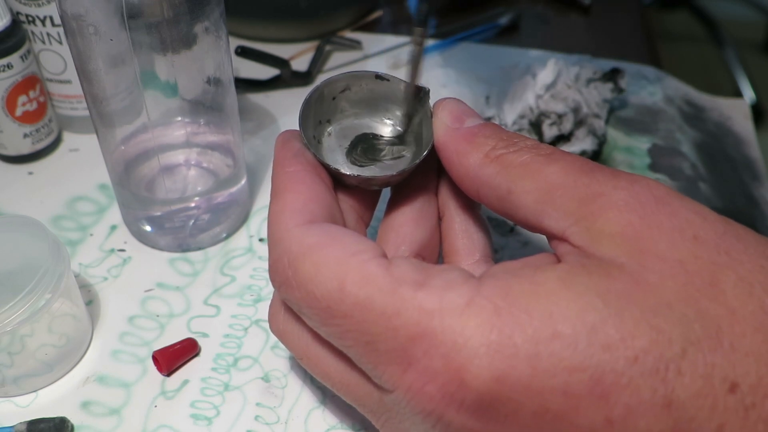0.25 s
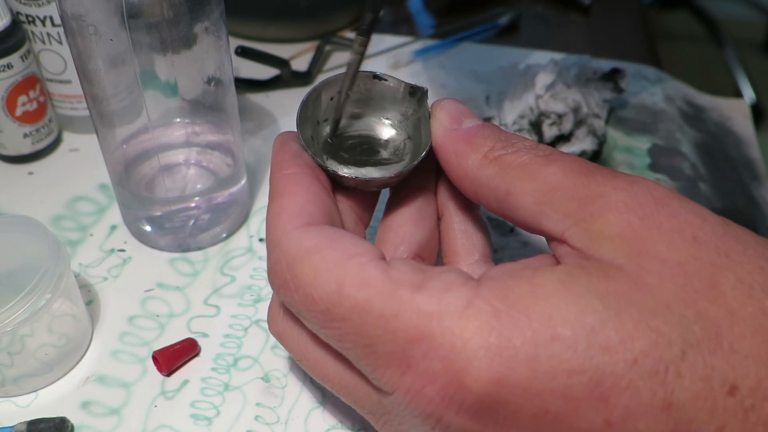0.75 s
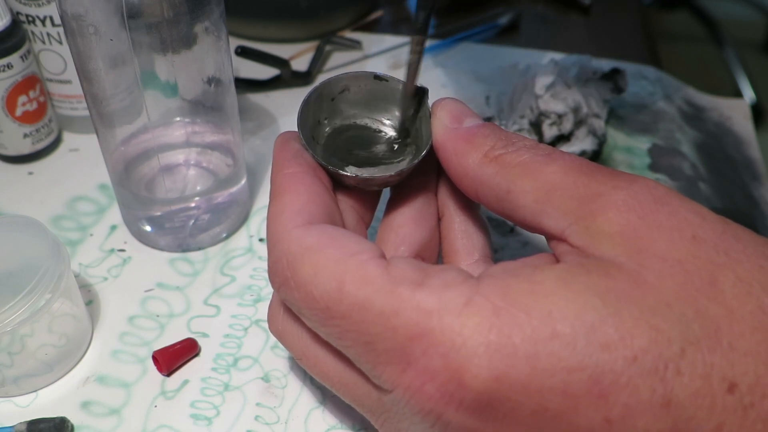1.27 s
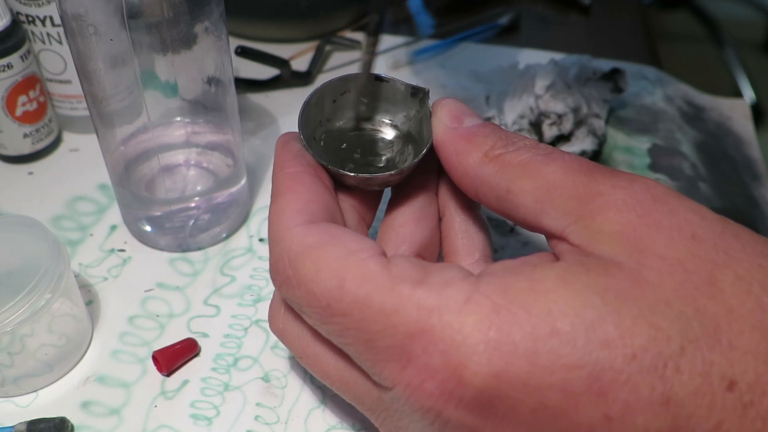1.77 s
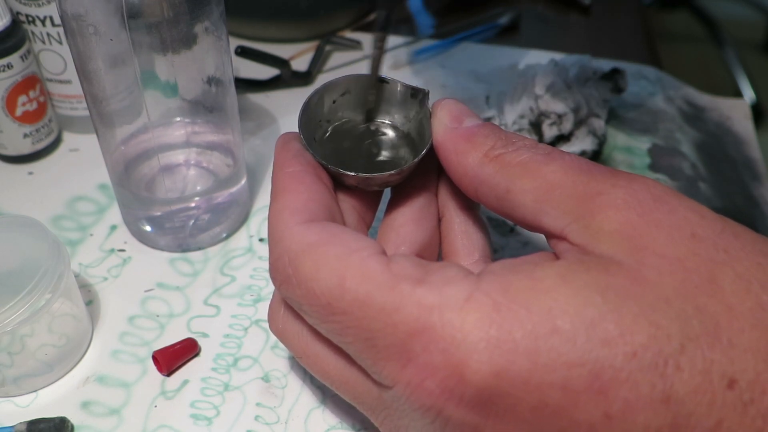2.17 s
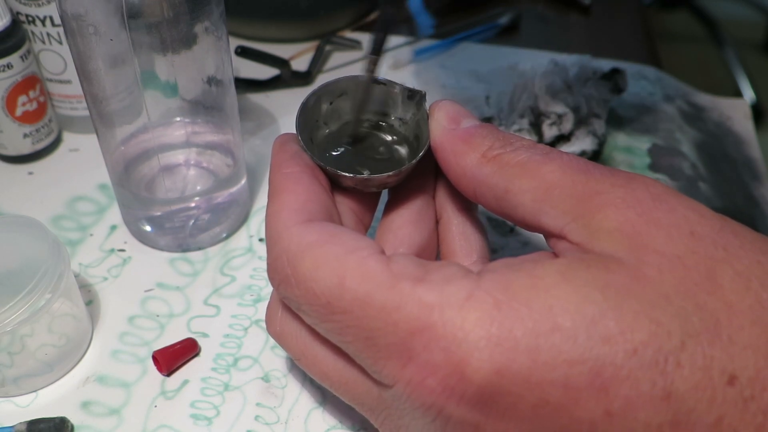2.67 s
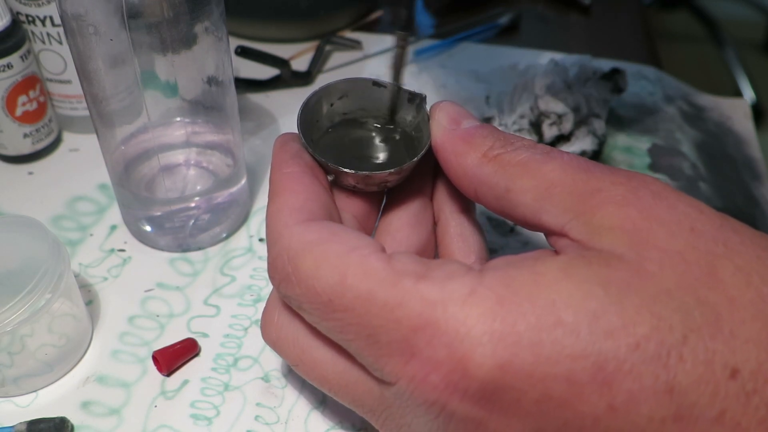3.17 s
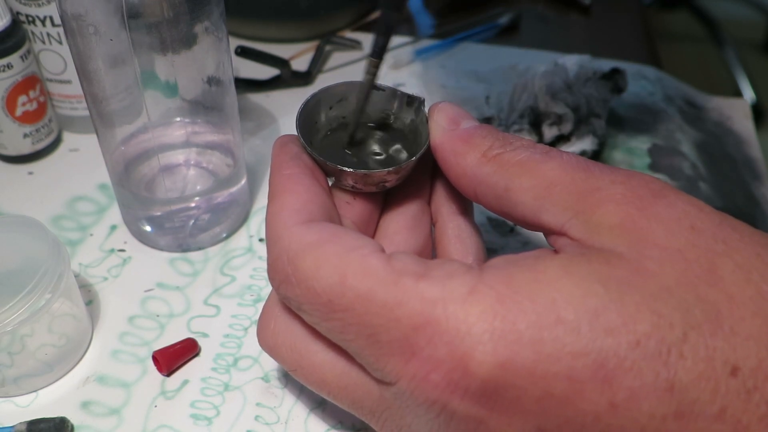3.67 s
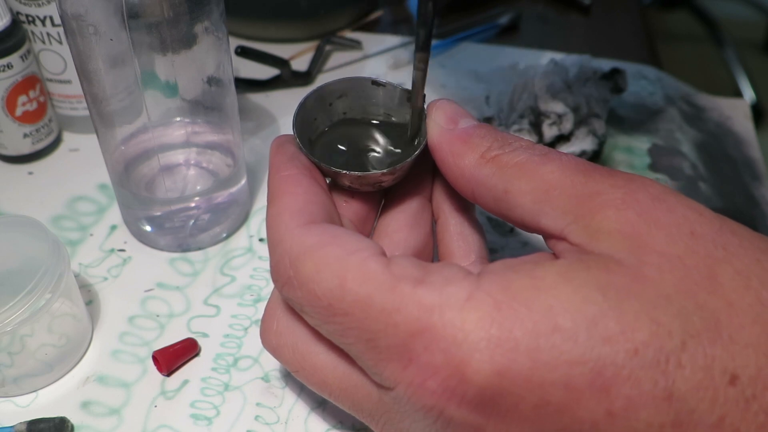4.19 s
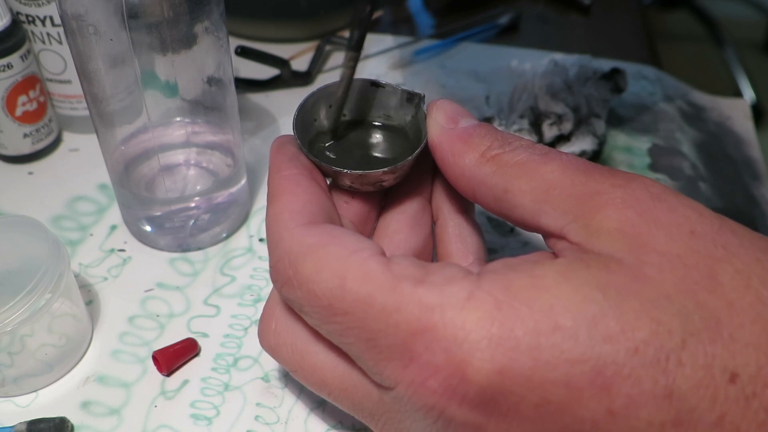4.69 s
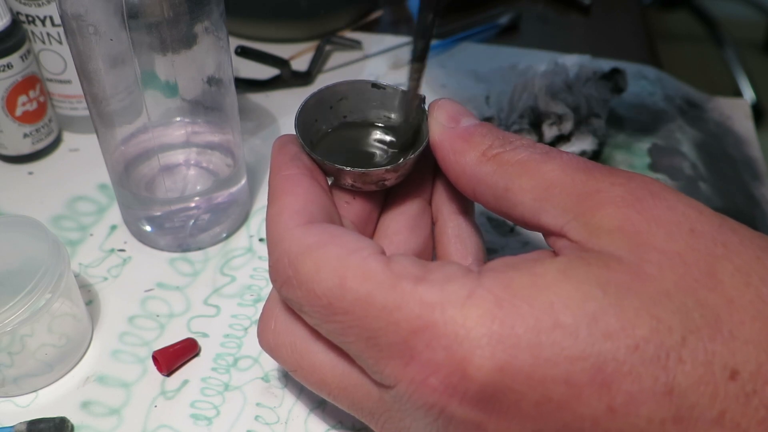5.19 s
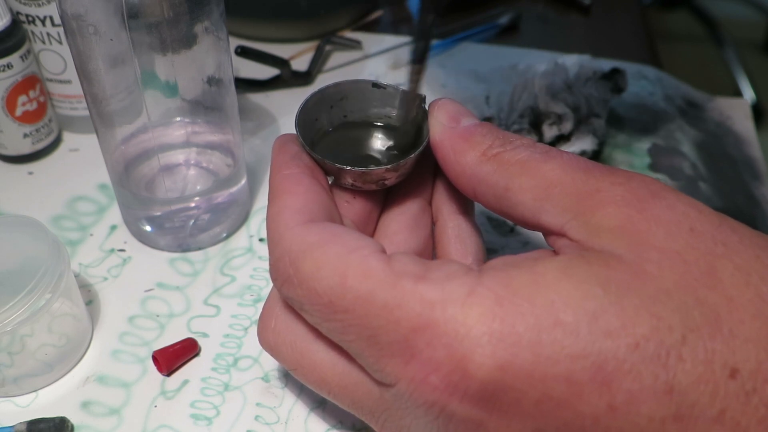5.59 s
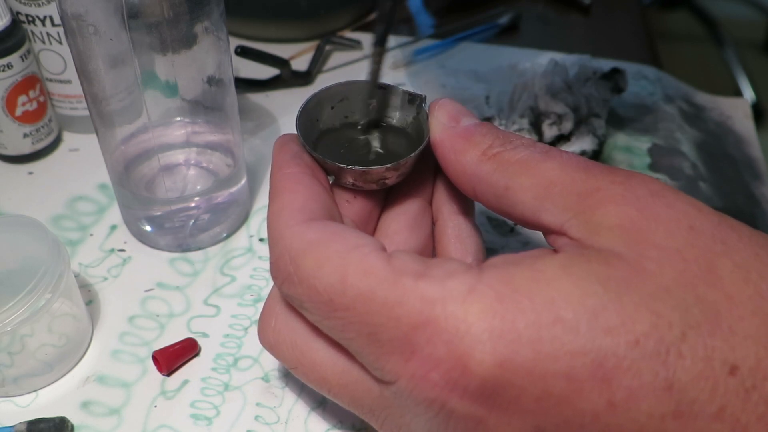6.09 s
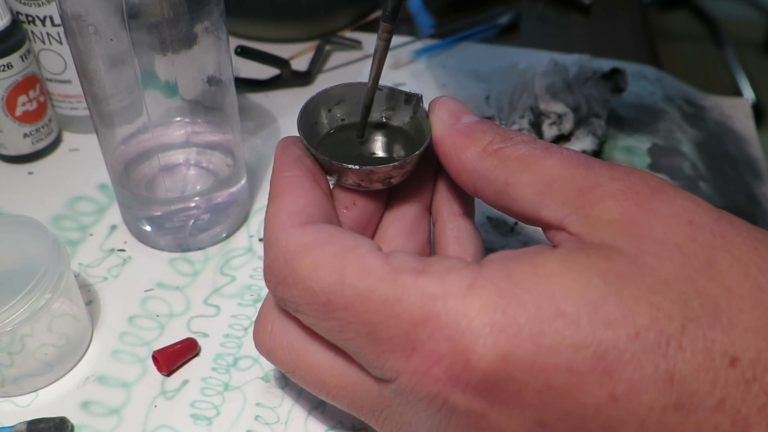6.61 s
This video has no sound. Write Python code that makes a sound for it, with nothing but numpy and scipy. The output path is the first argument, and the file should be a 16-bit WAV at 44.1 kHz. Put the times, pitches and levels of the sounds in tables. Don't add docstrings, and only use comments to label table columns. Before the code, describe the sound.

Fast, slightly uneven stirring in a tiny metal cup: bristles hiss brightly across the bottom while the metal collar scrapes, taps and sharply clicks against the wall. Dry scrapes lead in the first two seconds, then wetter, stronger swishes take over with scattered hard ticks and brief thin squeaks. Little liquid plips come in the last half second. Close stereo microphone, small quiet room, low steady hiss and barely audible hum.

```python
import sys
import numpy as np
from scipy import signal
from scipy.io import wavfile

SR = 44100
rng = np.random.default_rng(int(sys.argv[2]) if len(sys.argv) > 2 else 0)


def unload_audio(sound):
    columns = np.transpose(np.atleast_2d(sound))
    steps = np.round(np.clip(columns, -1, 1) * 32767)
    wavfile.write(sys.argv[1], SR, steps.astype(np.int16))


def invert_db(level):
    return 10 ** (np.asarray(level, dtype=float) / 20)


N = 302085
SLOW_STEP = 40
LEFT_RIGHT = np.array([[1], [-1]])


def rms_one(x):
    return x / np.sqrt(np.mean(x ** 2) + 1e-20)


def at_hz(points, hz):
    curve_hz, value = np.transpose(points)
    return np.interp(np.log(hz), np.log(curve_hz), value)


def pan(left_right_db):
    return invert_db(LEFT_RIGHT * left_right_db / 2)


def drift(rate_hz):
    r = np.exp(-2 * SLOW_STEP * np.pi * rate_hz / SR)
    noise = rng.standard_normal(N // SLOW_STEP + 1001)
    return rms_one(signal.lfilter([1], [1, -2 * r, r * r], noise)[1000:])


def full_rate(slow):
    return np.repeat(slow, SLOW_STEP, axis=-1)[..., :N]


def strokes(rows, extra_db, edge):
    power = np.zeros(N)
    for row, more_db in zip(rows, extra_db + np.zeros(len(rows))):
        start_s, level_db, rise_ms, fall_ms = row[:4]
        first, last = max(0, round((start_s - .15) * SR)), min(N, round((start_s + .2) * SR))
        i = np.arange(first, last)
        late_ms = 1000 * (i / SR - start_s)
        span_ms = np.where(late_ms < 0, max(rise_ms, 1), max(fall_ms, 1))
        shape = np.exp(-(np.abs(late_ms) / span_ms) ** np.where(late_ms < 0, edge, 1.4))
        power[i] += (invert_db(level_db + more_db) * shape) ** 2
    return np.sqrt(power)


def grit(per_s, spread_db):
    sizes = invert_db(spread_db * np.minimum(rng.exponential(1, N), 4)) * rng.choice([-1, 1], N)
    return rms_one(sizes * (rng.random(N) < per_s / SR))


def two_ports(per_s, spread_db, unlike):
    shared = np.sqrt(1 - unlike) * grit(per_s, spread_db)
    opposed = np.sqrt(unlike) * grit(per_s, spread_db) * LEFT_RIGHT
    return shared + opposed


# time_s, dryness [0-1]
DRYNESS = [(0, 0.73), (1.5, 0.68), (2.1, 0.36), (3.6, 0), (4.2, 0.1), (6.85, 0.08)]


def cup(force, modes, wander_db):
    out, power = np.zeros((2, N)), 0
    slow_s = np.arange(N // SLOW_STEP + 1) * SLOW_STEP / SR
    dry = np.interp(slow_s, *np.transpose(DRYNESS))
    for k, (hz, width_hz, level_db, lag_rad, dry_db) in enumerate(modes):
        grip_db = wander_db * drift(9.15) + dry_db * dry
        facing_db = 0.69 * wander_db * drift(6.6) * LEFT_RIGHT
        left, right = force * full_rate(invert_db(level_db + grip_db + facing_db)) + 1e-18
        r, w = np.exp(-np.pi * width_hz / SR), 2 * np.pi * hz / SR
        zeros = (-1) ** k * (1 - r * r) / 2 * np.array([1, 0, -1])
        poles = [1, -2 * r * np.cos(w), r * r]
        late = np.sin(lag_rad) / np.sin(w)
        lag_taps = [np.cos(lag_rad) - late * np.cos(w), late]
        out[0] += signal.lfilter(zeros, poles, left)
        out[1] += signal.lfilter(np.convolve(zeros, lag_taps), poles, right)
        power += invert_db(level_db) ** 2 * np.pi * width_hz / SR
    return out / np.sqrt(power) * invert_db(-.13 * wander_db ** 2)


# pitch_hz, density_db_per_hz
HISS = [(24, -85), (40, -45.5), (354, -9.5), (570, -8.5), (733, -10), (2100, -16), (2260, -16), (2700, -6),
        (2980, -15), (4680, -17), (16000, -33)]
# pitch_hz, correlation [-1 to 1]
LIKENESS = [(60, -0.36), (150, -0.54), (380, -0.71), (950, -0.27), (2380, 0.38), (5980, 0.29),
            (15000, 0.0019)]


def room_hiss():
    hiss_db, hum_db, hum_hz = -66, -107.5, 120
    hiss = 0
    edges_hz = 30 * 2 ** np.arange(0, 9.6, .5)
    white = rng.standard_normal((2, 2, N))
    for k, (low_hz, high_hz) in enumerate(zip(edges_hz, edges_hz[1:])):
        band_hz = [low_hz, min(high_hz, .45 * SR)]
        mid, side = signal.sosfilt(signal.butter(2, band_hz, "band", fs=SR, output="sos"), white[k % 2])
        hz = np.sqrt(low_hz * high_hz)
        alike = np.clip(at_hz(LIKENESS, hz), -1, 1)
        sway_db = 2.25 * drift(5.8) * np.clip(200 / hz, .2, 1)
        band = np.sqrt(1 + alike) * mid + np.sqrt(1 - alike) * side * LEFT_RIGHT
        hiss = hiss + full_rate(invert_db(at_hz(HISS, hz) + sway_db)) * band
    hum_level = full_rate(invert_db(hum_db + 5.9 * drift(8.8)))
    hum = hum_level * np.sqrt(2) * np.sin(2 * np.pi * hum_hz * np.arange(N) / SR)
    return invert_db(hiss_db) * rms_one(hiss) + hum


def room(x):
    t60_s, level_db, first_echo_s = 0.31, -21.5, .004
    t = np.arange(SR // 3) / SR
    tail = rng.standard_normal((2, len(t))) * invert_db(-60 * t / t60_s) * (t > first_echo_s)
    tail = tail / np.sqrt(np.sum(tail ** 2, axis=1, keepdims=True))
    return invert_db(level_db) * signal.fftconvolve(x, tail, axes=1)[:, :N]


# start_s, peak_db, pitch_hz
DRIPS = [
    (6.315, -49.5, 2730),
    (6.323, -71, 2750),
    (6.393, -63, 2540),
    (6.5755, -67, 2850),
    (6.5925, -61, 2560),
    (6.609, -56, 2750),
    (6.661, -68, 2600),
    (6.752, -61, 2670),
    (6.80, -76, 2750),
]


def drips():
    out, t = np.zeros(N), np.arange(900) / SR
    swell = np.minimum(t / 0.00056, 1)
    knock = invert_db(-15.0) * np.sin(2 * np.pi * 1080 * t) * np.exp(-t / 0.012)
    for start_s, peak_db, pitch_hz in DRIPS:
        i = round(start_s * SR)
        bubble = np.sin(2 * np.pi * pitch_hz * t * (1 + 3 * t)) * np.exp(-t / 0.0058)
        out[i:i + 900] += invert_db(peak_db) * swell * (bubble + knock)
    return out


# start_s, peak_db, left_right_db
SNAPS = [(1.1484, -35, -1.0), (1.1563, -29, 2), (1.333, -27, 1.0), (1.3574, -30, 1.0), (2.7033, -32, 3),
         (2.8944, -32, 2.5), (2.9204, -33, -2), (3.078, -26, -8), (3.4678, -23, 1), (3.922, -29, 4),
         (4.0974, -34, -2), (4.106, -42, 1.0), (4.1275, -33, -3), (4.136, -22.5, 0), (4.3116, -26, 0.0),
         (4.5169, -20, -2.0), (4.7007, -28, 13), (4.895, -26, -1.0), (5.1087, -41, -7), (5.4223, -35, -2.5),
         (5.6634, -30, -6), (5.8884, -32, -0.5), (6.4734, -36, -1.5)]


def snaps():
    decay_s, trim_db = 0.00024, -7
    out = np.zeros((2, N))
    cracks = rng.standard_normal((len(SNAPS), 100)) * np.exp(-np.arange(100) / (decay_s * SR))
    for (start_s, peak_db, left_right_db), crack in zip(SNAPS, cracks):
        i = round(start_s * SR)
        out[:, i:i + 100] += invert_db(peak_db + trim_db) * pan(left_right_db) * crack / np.abs(crack).max()
    return signal.sosfilt(signal.butter(2, 3500, "high", fs=SR, output="sos"), out)


# start_s, length_ms, level_db, pitch_hz
SINGS = [(0.391, 5, -35, 3590), (0.59, 15.3, -53.5, 3144), (1.165, 17, -54.5, 4900), (1.355, 32, -54, 3410),
         (1.345, 30, -54, 5180), (1.553, 12, -45, 4910), (1.556, 12, -56, 3390), (2.862, 20, -61, 4200),
         (2.882, 15, -50, 3850), (2.898, 19, -51, 5350), (3.084, 13, -56, 3800), (3.28, 9.2, -54, 3890),
         (3.28, 10, -53, 2640), (3.671, 15, -66, 4020), (3.737, 10, -52, 3490), (3.77, 54, -76, 2190),
         (3.884, 40, -69, 2750), (4.1, 25, -51, 5670), (4.101, 27, -58, 3030), (4.874, 16, -59.5, 2810),
         (5.41, 45, -57, 6300), (5.484, 11, -56, 4170), (5.53, 25, -65, 11570), (5.6, 20, -59, 11800),
         (5.686, 8.3, -44, 5700), (5.834, 19, -59, 6480), (5.89, 18, -58, 5450), (4.248, 4, -66, 11500),
         (4.437, 20, -58, 11500), (4.634, 14, -64, 11100), (2.86, 38, -52, 11600), (5.237, 18, -34, 11600),
         (5.812, 45, -46.5, 11870), (5.615, 36, -49, 11700), (4.94, 56, -68, 11550),
         (5.036, 18, -52.5, 11500), (3.08, 56, -75, 392), (3.189, 38, -73, 337)]


def wall_song():
    width_share, sag_per_s, left_right_db = 0.042, 1.24, 6.5
    out, t = np.zeros(N), np.arange(4000) / SR
    noises = rng.standard_normal((len(SINGS), 2, 4000))
    for (start_s, length_ms, level_db, pitch_hz), noise in zip(SINGS, noises):
        r = np.exp(-np.pi * width_share * pitch_hz / SR)
        sway = rms_one(signal.lfilter([1], [1, -2 * r, r * r], noise))
        phase = 2 * np.pi * pitch_hz * t * (1 - sag_per_s * t / 2)
        tone = sway[0] * np.cos(phase) + sway[1] * np.sin(phase)
        shape = np.minimum(t / .002, 1) * np.exp(-(1000 * t / max(length_ms, 2)) ** 3)
        i = round(start_s * SR)
        out[i:i + 4000] += invert_db(level_db) * shape * tone
    out = signal.sosfilt(signal.butter(4, 220, "high", fs=SR, output="sos"), out)
    return out * pan(left_right_db)


# start_s, peak_db, low_wall_share_db, left_right_db
KNOCKS = [(0.3912, -28, 3, 1), (0.397, -51, -6, 0), (1.1708, -36, 5, 4), (1.349, -31, -25, 13),
          (1.5422, -40, -23, -3), (1.5539, -39, 1, 12), (1.9735, -34, -9, 6), (2.7213, -23.5, -22, 7),
          (2.7273, -28, -7, -3), (2.8990, -29.5, -15, -1), (2.9148, -25, -12, 16), (3.088, -27, -15, 4),
          (3.282, -34, -10, -11), (3.47, -26, -17, -7), (4.5172, -23.5, -43, -5), (5.0984, -54, -24, 12),
          (5.4888, -37, -9, 23), (5.6635, -33.5, -3.5, 13.5)]
# start_s, peak_db
MORE_KNOCKS = [(0.1254, -48.5), (0.1676, -39.5), (0.347, -56), (0.9613, -41), (1.324, -44), (1.339, -56),
               (1.529, -44), (3.268, -40), (3.448, -40.5), (3.536, -41), (3.6606, -37.5), (3.742, -36.5),
               (3.8803, -39.5), (4.875, -32.5), (5.3036, -53), (5.616, -47), (5.687, -40), (5.797, -49),
               (5.8781, -41), (6.0649, -48), (6.466, -37), (6.8446, -62)]


def hits():
    shared_low_db, shared_left_right_db = -5, 1.5
    more_knocks = [(start_s, peak_db, shared_low_db, shared_left_right_db) for start_s, peak_db in MORE_KNOCKS]
    return sorted(KNOCKS + more_knocks)


# pitch_hz, width_hz, level_db, right_port_lag_rad, dry_cup_change_db
WALL_LOW = [(2580, 390, -5, 0.66, -0.5), (2750, 95, -0.5, 0.099, 3.5), (3106, 390, -1.5, 0.08, 0),
            (3417, 384, -2.5, 0.12, 6), (3890, 210, 2.5, 0.063, -8.5), (4140, 270, 3, 0.62, -20),
            (4864, 340, 0, 0.95, 4), (5104, 173, 1, 1, 5)]
WALL_MID = [(5560, 330, -1.8, 0.043, -7), (6435, 310, -1.2, 1.47, 0.5), (7010, 260, 0.49, 1.1, -1.5),
            (7650, 420, 0.27, 1.64, 2), (8200, 580, 2.2, 1.4, -6)]
WALL_HIGH = [(9400, 1630, 0.3, 1.7, 0.08), (10760, 470, -6, 0.59, .1), (11430, 600, -3.7, 2.6, 0.11),
             (12930, 1400, -1.5, 1, 0.066)]


def collar_ticks():
    events = hits()
    high, low = np.zeros((2, 2, N + 200))
    rattle = rng.standard_normal((len(events), 200)) * np.exp(-np.arange(200) / (.0009 * SR))
    for (start_s, peak_db, low_db, left_right_db), burst in zip(events, rattle):
        i = round(start_s * SR)
        force = invert_db(peak_db) * pan(left_right_db) * burst
        high[:, i:i + 200] += force
        low[:, i:i + 200] += force * invert_db(low_db)
    bright = invert_db(3.0) * cup(high[:, :N], WALL_HIGH + TOP[2:4], wander_db=7.5)
    return bright + cup(low[:, :N], WALL_LOW[1:] + WALL_MID, wander_db=3.5)


# start_s, level_db, rise_ms, air_share_db, upper_wall_share_db
DRY_SCRAPES = [
    (0.404, -38.5, 5.7, -27, -1),
    (0.587, -47, 2.6, -13, -1.5),
    (0.781, -46, 8.7, -14.5, -3.3),
    (0.973, -45, 10.6, -16.5, -3.5),
    (1.165, -46, 15.4, -15, -1),
    (1.351, -43, 23.6, -22, -0.2),
    (1.549, -41.5, 16.8, -22.5, -1.5),
    (1.967, -44.5, 7.2, -36, 1),
]
SCRAPES = [(2.714, -44.5, 17, -23.5, -1), (2.914, -46, 22, -17.5, -2), (3.09, -47.5, 12, -17, -5.5),
           (3.137, -48.5, 3.4, -25, -1), (3.28, -47.5, 6.2, -21, -2), (3.469, -49.5, 11.3, -26, -1.9),
           (3.67, -46, 7.3, -37, -0.8), (3.896, -51.5, 14, -45, -1), (3.926, -48.5, 10, -45, 2),
           (4.117, -43.5, 18.5, -29, -1.2), (4.701, -45.5, 7.9, -32.5, -1), (4.895, -42, 16, -29, -1.5),
           (5.109, -46.5, 7.9, -32, -0.2), (5.431, -50.5, 11, -43, 2.5), (5.489, -43.5, 6.7, -23.5, -0.5),
           (5.68, -41, 9, -19.5, -0.5), (5.894, -45.5, 18, -23.5, -1.1), (6.083, -41, 15, -27.5, -1.5),
           (6.482, -48.5, 12, -23.5, -1.2)]
# start_s, level_db, air_share_db
GRAZES = [
    (0.136, -50.5, -19),
    (0.36, -51.5, -9),
    (2.479, -53, -29),
    (2.869, -52.5, -24),
    (3.53, -61, -40),
    (3.733, -52, -26),
    (4.326, -49, -58),
    (4.519, -58, -25),
    (5.305, -64, -11),
]


def drags():
    scrape_fall_ms, graze_rise_ms, graze_fall_ms = 30.8, 13, 35.6
    rows = []
    for start_s, level_db, rise_ms, air_db, high_db in DRY_SCRAPES + SCRAPES:
        rows.append((start_s, level_db, rise_ms, scrape_fall_ms, air_db, high_db))
    for start_s, level_db, air_db in GRAZES:
        high_db = -4.5 - .11 * air_db
        rows.append((start_s, level_db, graze_rise_ms, graze_fall_ms, air_db, high_db))
    return np.array(rows)


# pitch_hz, width_hz, level_db, right_port_lag_rad, dry_cup_change_db
CUP_AIR = [(1319, 186, -2, 0.056, 5.5), (1686, 330, -3, 0.81, -3)]


def collar_scrape():
    edge = 4.5
    rows = drags()
    air_db, high_db = rows[:, 4:].T
    low_db = 10 * np.log10(np.clip(1 - invert_db(high_db) ** 2, .05, 1))
    slips = two_ports(2400, spread_db=2.5, unlike=.12) * pan(1.4)
    low = cup(slips * strokes(rows, low_db, edge), WALL_LOW, wander_db=2.5)
    high = cup(slips * strokes(rows, high_db, edge), WALL_MID + WALL_HIGH, wander_db=3.2)
    air = cup(slips * strokes(rows, air_db, edge), CUP_AIR, wander_db=4)
    return invert_db(0.45) * low + invert_db(2.0) * high + invert_db(1.5) * air


# start_s, level_db, fall_ms, top_share_db
SWEEPS = [(0.11, -46, 33, -11), (0.369, -43, 56, -12), (0.577, -39.5, 31.5, -8), (0.759, -40, 28.6, -7),
          (0.972, -43.5, 45, -2.5), (1.16, -42, 41, -4), (1.714, -38, 25, -12), (1.915, -40, 36, -5),
          (2.111, -37, 31.5, -11), (2.302, -40, 41, -7), (2.472, -35, 41.6, -8.5), (2.685, -47.5, 56, -5),
          (3.029, -42.5, 16.7, -6), (3.084, -34, 20, -10), (3.285, -44, 30, 0), (3.467, -34.5, 16.4, -8.5),
          (3.674, -42, 24, -7), (4.073, -39.5, 48, 3), (4.264, -35, 18.6, -11), (4.465, -36, 24.6, -19),
          (4.653, -33, 27, -10), (4.85, -38, 25, -6), (5.051, -40.5, 12, -10), (5.244, -33, 42, -8.5),
          (5.429, -31.5, 29.5, -4.5), (5.633, -35, 28, -1), (5.837, -35, 39, -5), (6.032, -39, 26.4, -6),
          (6.225, -40, 19.3, -10), (6.422, -40, 24, -13)]
# start_s, level_db, rise_ms, top_share_db
CLIMBS = [(0.163, -53.5, 46, 0), (2.068, -53.5, 25, 2), (2.253, -44.5, 26, -10), (2.896, -38, 17, -6),
          (3.423, -51.5, 34, -10), (3.624, -49, 23, -34), (3.898, -52, 59, -15), (4.133, -41, 12, -1),
          (4.336, -44.5, 31, -6), (4.724, -43, 15, 0), (5.126, -44.5, 76, -11), (5.336, -56, 21, -27),
          (5.903, -39, 17, -8), (6.1, -42, 27, -4), (6.49, -43.5, 22, 0), (6.559, -49.5, 43, -8)]
# start_s, level_db, fall_ms, top_share_db
FLICKS = [(0.001, -52, 22, -13), (0.395, -43, 100, -1), (0.792, -43, 31, 4), (1.308, -54, 18, -2),
          (1.35, -31.5, 16, -9), (1.504, -48, 60, 0), (1.545, -37, 30, -9), (1.966, -38.5, 23, -15),
          (2.723, -38.5, 16, -4), (2.823, -53, 23, -2.5), (2.865, -41.5, 14, -3), (2.918, -41, 9.8, 2),
          (3.196, -52, 15, -11), (3.219, -48, 34, -16), (3.785, -54.5, 25, -13), (4.516, -39.5, 10, 0),
          (4.906, -36, 35, -13), (5.488, -40.5, 15, 1), (5.538, -59, 38, -22), (5.687, -44, 7.8, 0),
          (6.514, -44, 15, -13), (6.59, -49, 8.8, -23), (6.846, -57, 8, -14)]
# time_s, left_right_db
TILT = [(0, 4.5), (0.8, -1), (1.6, -2.5), (2.0, -2.5), (2.4, -8.5), (2.9, -10.5), (3.3, 0), (3.7, -6),
        (4.1, -1), (4.9, -2), (5.4, -5.5), (6.0, -1.5), (6.85, -6)]


def swishes():
    rows = []
    for start_s, level_db, fall_ms, top_db in SWEEPS:
        rows.append((start_s, level_db, 0.72 * fall_ms, fall_ms, top_db, 0))
    for start_s, level_db, rise_ms, top_db in CLIMBS:
        rows.append((start_s, level_db, rise_ms, 0.68 * rise_ms, top_db, 0.5))
    flick_rise_ms = 4.1
    for start_s, level_db, fall_ms, top_db in FLICKS:
        rows.append((start_s, level_db, flick_rise_ms, fall_ms, top_db, 0.5))
    rows = np.array(rows)
    rows[:, 5] += np.interp(rows[:, 0], *np.transpose(TILT))
    return rows


# pitch_hz, width_hz, level_db, right_port_lag_rad, dry_cup_change_db
BOTTOM = [(6410, 460, -19.5, 0.55, -0.5), (8830, 460, -27.5, 1.1, 3), (10330, 310, -9, 0.91, 5),
          (10810, 265, -3.5, 1.33, 7), (11253, 167, 2.5, 0.19, -1.5), (11390, 190, 5, 1.06, -5.5),
          (11830, 340, 3.5, 1.64, -7.5), (11736, 310, -6, 1.7, 3)]
TOP = [(13080, 330, 1.5, 0.34, 1.2), (13100, 630, -10.5, 2.27, 1.9), (13740, 610, -3, 1.8, 0.086),
       (14470, 390, -0.5, 1.8, 0.093), (15300, 500, -2.5, 0.42, 0.13), (15600, 960, -18.5, 0.72, .1)]


def bristles():
    top_lag_s = 0.003
    rows = swishes()
    top_db, pan_db = rows[:, 4:].T
    top_db = np.minimum(top_db, -2)
    later = rows + [top_lag_s, 0, 0, 0, 0, 0]
    slips = two_ports(10000, spread_db=4.0, unlike=.15)
    push = np.array([strokes(rows, side * pan_db / 2, edge=3.2) for side in (1, -1)])
    top_push = np.array([strokes(later, top_db + side * pan_db / 2, edge=2.0) for side in (1, -1)])
    firmness = (push / invert_db(-40.0)) ** 0.053
    main = cup(slips * push, BOTTOM, wander_db=3.2)
    top = cup(slips * top_push * firmness, TOP, wander_db=3.2)
    return invert_db(-0.9) * main + invert_db(-1.8) * top


def scene():
    brush = drips() + snaps() + wall_song() + collar_ticks() + collar_scrape() + bristles()
    return brush + room(brush) + room_hiss()


def top_cut(x):
    return signal.sosfilt(signal.butter(12, 15450, fs=SR, output="sos"), x)


def record(dry):
    top_hz = 15700
    rounded = .4 * np.tanh(dry / .4)
    low_pass = signal.cheby2(10, 50, top_hz * 1.04, fs=SR, output="sos")
    mix = signal.sosfilt(low_pass, rounded)
    return top_cut(mix)


dry = scene()
out = record(dry)
unload_audio(out)
```